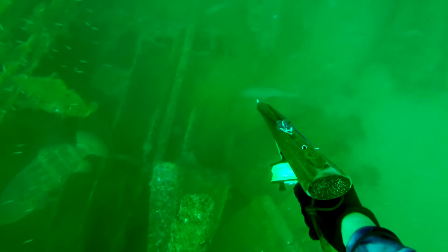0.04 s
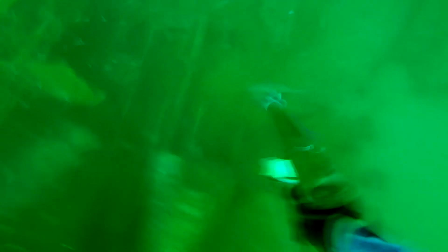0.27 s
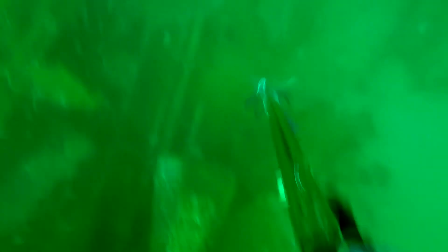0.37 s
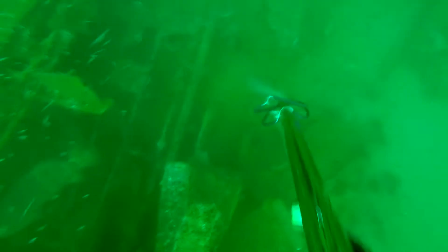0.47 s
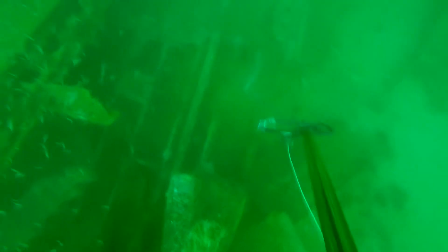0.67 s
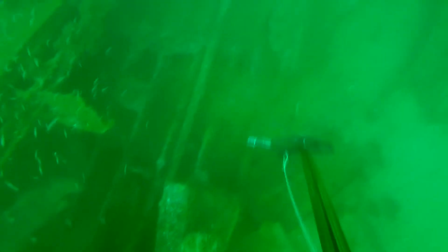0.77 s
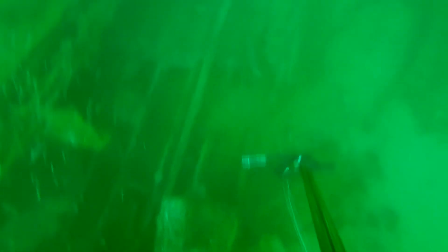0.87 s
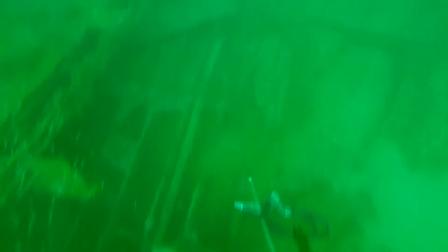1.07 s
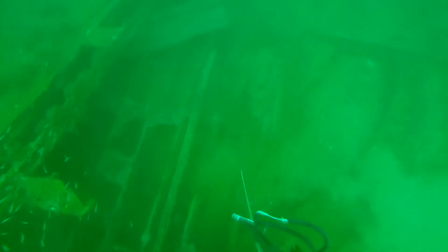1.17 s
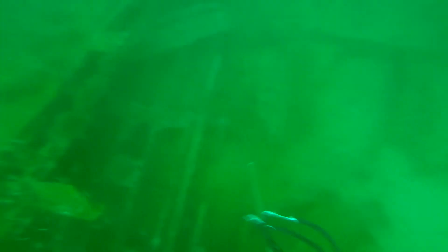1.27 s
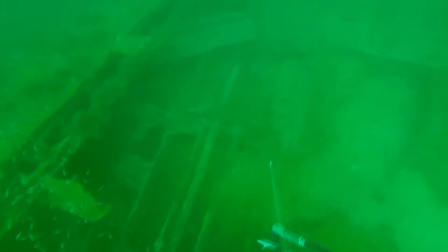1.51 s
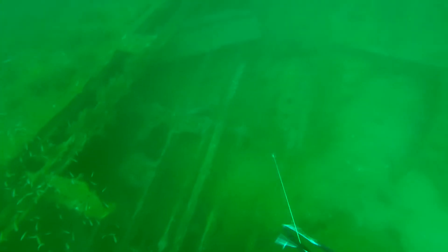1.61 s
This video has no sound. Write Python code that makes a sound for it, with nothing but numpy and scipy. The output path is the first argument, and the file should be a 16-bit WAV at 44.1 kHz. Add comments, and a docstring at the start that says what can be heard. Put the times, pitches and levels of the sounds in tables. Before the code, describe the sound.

A spear gun fires under water: a deep boom, then a sharp clack and brief shaft rattle, fading to tiny ticks; later a duller clack and boom with crackling line, heard close inside a sealed housing.

```python
"""A deep boom, the clack of a spear gun, the rattle of its shaft leaving and the slap of its bands; then small ticks.
Later a second clack and boom come amid a crackling rustle of line and gear, over faint hiss and stirring water.
Place: under water beside a wreck. Microphone: one, in a sealed camera housing. Distance: only in the set levels.
Booms (perhaps a grouper's swim bladder), jolts and the shaft are dying sines; contacts are noise bursts and rattles
are dense random impacts, both ringing the housing's resonances; the murmur and the water are filtered noise."""
import sys
import numpy as np
from scipy.fft import rfft, irfft, next_fast_len
from scipy.io import wavfile
from scipy.ndimage import map_coordinates

SR = 44100
rng = np.random.default_rng(int(sys.argv[2]) if len(sys.argv) > 2 else 0)


def dump_mix(stems):
    """Bounce the given channels to the path in sys.argv[1] as a 16-bit WAV at rate SR."""
    frames = np.atleast_2d(stems).T  # one column per channel
    limited = np.clip(frames, -1, 1)  # hard clip at full scale
    pcm = np.round(limited * 32767).astype(np.int16)
    wavfile.write(sys.argv[1], SR, pcm)


N = 72765
T = np.arange(N) / SR  # time, s

# Deep booms, perhaps a grouper's swim bladder: [start t/s, level/dB, t60/s]
BOOMS = [(0.181, -9, .15), (1.008, -11, 0.16)]
# Soft jolts of gun and housing: [start t/s, f/Hz, level/dB, t60/s, rise/s]
JOLTS = [(0.1917, 160, -30, 0.044, .004), (.2515, 465, -29, 0.024, 0.0031),
         (0.2559, 94, -17, 0.048, 0.0016), (0.2465, 23.7, -10, 0.22, 0.067),
         (0.2941, 164, -22, 0.039, 0.0052), (0.3113, 125, -22.5, 0.061, 0.0051),
         (0.3047, 263, -27, 0.064, 0.0027), (0.347, 162, -28, 0.068, 0.004),
         (0.351, 446, -36.5, 0.049, 0.0024), (.353, 665, -41, 0.027, 0.0012),
         (.358, 130, -24.5, 0.07, 0.0044), (.457, 80, -34.5, .08, 0.0047), (.989, 158, -24.5, 0.05, 0.0079),
         (1.633, 109, -30.5, 0.14, 0.015)]
# Hard contacts: [t/s, level before CLACK_DB/dB, centre of the ring f/Hz, treble relative to body/dB, t60/s]
CONTACTS = [(0.2509, -13, 1500, -8, .01), (.2526, -8, 1430, -14, .02), (.2533, -8.5, 2740, -3.5, 0.016),
            (0.2541, -10.5, 2700, 0, 0.012), (0.256, -16.5, 2350, 1, 0.011),
            (0.2647, -11.5, 2370, -7, 0.036), (0.2692, -11, 2630, -17, .012), (0.2749, -25, 2420, -6, .015),
            (0.2793, -10.5, 2570, -8.5, 0.033), (0.2916, -22, 1700, -8, .015), (.302, -43, 2200, -24, .01),
            (0.312, -34.5, 2400, 3, 0.016), (0.33, -43, 2200, -8, 0.048), (0.3471, -18, 2220, -14, 0.024),
            (0.3527, -13.5, 2700, -10, 0.032), (.3575, -24, 2400, -6, 0.013), (.3617, -18, 2100, -9, 0.014),
            (.3665, -27, 1700, -16, .012), (0.3835, -37, 2110, -3, 0.044), (0.462, -44, 2800, 0, 0.024),
            (0.4737, -34.5, 2920, -1.5, 0.015), (0.4748, -43, 2900, 1, 0.014), (0.477, -41, 2200, 1, 0.013),
            (0.493, -37, 2800, 1.5, 0.019), (.546, -49, 2800, -4, .02), (.5905, -34, 2000, 2, .009),
            (0.5961, -48.5, 3000, 14.5, 0.017), (.616, -44, 2500, 4, .04), (.6224, -36.5, 3360, 13, 0.0077),
            (.629, -32, 2400, -2.5, 0.0072), (0.635, -48, 2800, -9, .01), (0.656, -31, 2000, -18, .01),
            (0.68, -49, 1400, -14, 0.027), (0.915, -33.5, 2210, -8.5, 0.018),
            (.9517, -31, 1720, -23, 0.045), (.9895, -22, 1600, -9, .014), (0.995, -39, 2400, -14, 0.016),
            (.9965, -18, 1290, -44, 0.023), (1.002, -38, 2000, -22, .02), (1.0044, -10, 2500, -27, 0.0093),
            (1.006, -23, 1850, -19, .02), (1.0235, -29, 1850, -16, 0.017), (1.087, -41, 1760, -18, 0.058),
            (1.113, -23, 1740, -23, 0.013), (1.118, -32, 1500, -18, 0.023),
            (1.134, -23.5, 1890, -32, 0.024), (1.15, -30, 1900, -18, 0.025), (1.159, -28, 1870, -16, 0.023),
            (1.225, -25.5, 2200, -24.5, 0.028), (1.229, -29, 1900, -18, 0.03),
            (1.245, -29, 1900, -22, 0.12), (1.3297, -31, 1900, -24, .012), (1.338, -31, 1900, -14, 0.011),
            (1.357, -36, 1750, -18, .02), (1.378, -32, 1900, -18, 0.022), (1.3505, -49, 3500, 6, 0.016),
            (1.363, -46, 3000, 5, 0.016), (1.5618, -20.5, 2600, -29, .01), (1.568, -51, 1500, -15, 0.013),
            (1.577, -31, 2750, -13, 0.023), (1.584, -54, 1350, -14, .02), (1.614, -42, 2900, 2, 0.022),
            (1.6207, -30, 2400, -20, .02), (1.625, -41, 1400, -16, .015), (1.6335, -32, 2750, -4, 0.028),
            (1.639, -43, 2000, -14, .025)]
# Thin ring after the slap: [start t/s, f/Hz, level/dB, t60/s, rise/s]
SHAFT_RING = (.374, 2085, -50, .17, .008)
# Shaft and bands rattling: [t/s, level before swell/dB, treble relative to body/dB, tilt of body/dB per octave]
RATTLE = [(.252, -35, -6, 3), (.262, -44.5, -5, 4), (.282, -39.5, 3, -12), (.298, -39.5, -15, -3.5),
          (.316, -44.5, -16, -3), (.324, -52, -6, -1), (.346, -54.5, -10, -11), (.356, -34.5, -14.5, -9),
          (.371, -41.5, -7.5, 4.5), (.378, -61.5, -13, 12), (.4, -61, -4, 6), (.44, -70, -13, 4)]
# Rustle of line and gear: [t/s, level before swell/dB, treble relative to body/dB, tilt of body/dB per octave]
RUSTLE = [(0.93, -64.5, -27, -7), (0.956, -61.5, 3, 15), (0.976, -56.5, -42, -4), (0.992, -47, 0.5, 19),
          (1.014, -48, -14.5, -4), (1.126, -51, -18.5, 1.5), (1.192, -52.5, -14, 3.5),
          (1.22, -52, -10.5, 3.5), (1.342, -52, -14, -4.5), (1.348, -50.5, -6, -6.5),
          (1.406, -62, -17, -8.5), (1.452, -62, -4, 0), (1.502, -63, -11, -1), (1.512, -58.5, 5, 3),
          (1.526, -69.5, -8, 26), (1.568, -51.5, -2.5, -17), (1.59, -67.5, -8, 3), (1.65, -44.5, -12, 4)]
# Low resonances of the housing: [f/Hz, width before damping/Hz, relative level/dB]
BODY_MODES = [(1245, 110, 5.5), (1320, 51, -3.5), (1435, 100, -3), (1789, 48, 3), (1860, 47, 6),
              (2114, 136, 1), (2325, 164, 0.5), (2740, 257, 1), (3056, 50, -0.5), (3025, 85, -1),
              (3500, 420, -6)]
# High resonances of the housing: [f/Hz, width before damping/Hz, relative level/dB]
SHELL_MODES = [(3830, 390, -2.5), (4510, 467, 9.5), (4910, 840, 6.5), (5400, 334, 2), (6270, 243, -2),
               (7630, 720, -11.5), (9900, 600, -34), (11800, 1200, -22)]
# Lingering low murmur of the housing: [t/s, level/dB]
MURMUR = [(.95, -59.5), (1.1, -62.5), (1.35, -66), (1.45, -60.5), (1.58, -72), (1.65, -59)]
# Spectrum of the steady water hiss: [f/Hz, relative level/dB]
HISS_SPECTRUM = [(88, -60), (150, -4.5), (243, -6), (284, -4.5), (418, -7), (907, -10), (1080, -11.5),
                 (1340, -11.5), (5080, -22.5), (15300, -40.5)]
# Low stirring of the water: [t/s, upper band level before swell/dB, lowest band level/dB]
SURGE = [(0.0, -64, -58), (0.142, -62.5, -56.5), (0.27, -51, -43), (0.32, -48, -33), (0.458, -52.5, -51),
         (0.61, -55.5, -56.5), (0.758, -57, -59.5), (0.918, -57.5, -54), (1.066, -50.5, -45),
         (1.158, -56.5, -54), (1.276, -56.5, -51.5), (1.414, -54, -52), (1.65, -61, -57.5)]

BOOM_HZ, BOOM_RISE_S = 57.5, 0.025
CLACK_DB, STRIKE_DB = -7, 16  # gain of all contacts; extra on the first sample of each
FOCUS_DB = 18.5  # body loss per octave away from the centre of the ring
CLACK_DAMPING = 2.6  # widens every resonance under hard contacts
CLACK_TOP_HZ, CRACKLE_TOP_HZ = 9500, 6500  # high edge of the shell
BODY_EDGE_HZ, BODY_TOP_HZ = 1150, 3800  # low edge of the whole housing, high edge of the body
GRAINS_PER_S, GRAIN_SPREAD_DB = 1500, 5.5
RATTLE_SWELL_DB, RUSTLE_SWELL_DB, MODE_WANDER_DB = 3.0, 1, 2.5
SHARED = 0.41  # power share of impacts common to all modes
TILT_PIVOT_HZ = 2000
MURMUR_HZ, MURMUR_WIDTH_HZ = 1214, 67
HISS_DB = -58
SURGE_HZ, SPLIT_HZ = 128, 64  # roll-off of the upper band; border between the bands
TOP_HZ = 15300  # band limit of the camera


def thuds():
    """Booms, perhaps a grouper's swim bladder, and jolts of gun and housing: low sines that swell and die."""
    booms = sum(swing(start, BOOM_HZ, db, t60, BOOM_RISE_S) for start, db, t60 in BOOMS)
    jolts = sum(swing(*row) for row in JOLTS)
    return booms + jolts


def clacks():
    """Each contact is a sharp strike and a dying noise burst; higher shell modes are pushed more briefly."""
    dull = np.zeros((len(BODY_MODES), N))
    bright = np.zeros((len(SHELL_MODES), N))
    burst_t = T[:SR // 10]
    shell_hz = np.array(SHELL_MODES)[:, :1]
    for start, db, centre_hz, treble_db, t60 in CONTACTS:
        i = round(start * SR)
        t = burst_t[:N - i]
        span = slice(i, i + len(t))
        fall_db = -60 * t / t60
        peak_db = db + CLACK_DB + STRIKE_DB * (t == 0)
        off_centre_db = FOCUS_DB * np.abs(body_octaves(centre_hz))
        dull[:, span] += amp(peak_db + fall_db - off_centre_db)
        bright[:, span] += amp(peak_db + treble_db + fall_db * shell_hz / shell_hz[0])
    sign = np.sign(rng.standard_normal(N))  # turns the envelopes into noise
    return housing(dull * sign, bright * sign, CLACK_TOP_HZ, CLACK_DAMPING)


def shaft_ring():
    """The thin ring after the slap, one swelling and dying sine."""
    return swing(*SHAFT_RING)


def crackle(table, swell_db):
    """Rattle or rustle: impacts under a level curve, partly common to all modes, partly each mode's own."""
    level_db, treble_db, tilt_db = curves(table)
    gain = amp(level_db + swell_db * wobble(59.55))
    common = np.sqrt(SHARED) * impacts(count=1)

    def pushes(modes):
        """Impacts on each mode, whose strength wanders alone."""
        mixed = common + np.sqrt(1 - SHARED) * impacts(len(modes))
        return mixed * amp([MODE_WANDER_DB * wobble(70) for _ in modes])

    body_tilt = amp(tilt_db.clip(-20, 20) * body_octaves(TILT_PIVOT_HZ))
    dull = gain * pushes(BODY_MODES) * body_tilt
    bright = gain * pushes(SHELL_MODES) * amp(treble_db)
    return housing(dull, bright, CRACKLE_TOP_HZ)


def impacts(count):
    """Rows of dense tiny impacts at random moments and of uneven size, scaled together to rms 1."""
    hit = rng.random((count, N)) < GRAINS_PER_S / SR
    strength = rng.standard_normal((count, N))
    spread = amp(GRAIN_SPREAD_DB * rng.exponential(size=(count, N))).clip(max=8)
    return unit(hit * strength * spread)


def housing(dull, bright, top_hz, damping=1):
    """Contacts ring the low body modes and the high shell modes of the sealed housing."""
    body = ringing(dull, BODY_MODES, BODY_TOP_HZ, damping)
    shell = ringing(bright, SHELL_MODES, top_hz, damping)
    return body + shell


def ringing(pushes, modes, top_hz, damping):
    """One push signal per resonance; their total power is set to 1 before a steep low and a high edge."""
    centre, width, db = np.transpose(modes)[..., None]

    def response(f):
        """Resonances between the two edges."""
        loss = 1j * f * width * damping
        modal = amp(db) * loss / (centre * centre - f * f + loss)
        modal = modal / np.sqrt(np.mean(np.abs(modal) ** 2) * len(modal))
        low, high = 1j * f / BODY_EDGE_HZ, 1j * f / top_hz
        low_edge = (low * low / (1 + low + low * low)) ** 3
        high_edge = 1 / (1 + 1.218 * high + high * high) ** 2
        return modal * low_edge * high_edge

    alternating = (-1) ** np.arange(len(centre))[:, None]  # neighbouring modes have opposite sign
    return (filtered(pushes, response) * alternating).sum(0)


def body_octaves(hz):
    """Signed distance in octaves of each body mode from hz."""
    return np.log2(np.array(BODY_MODES)[:, :1] / hz)


def murmur():
    """A low housing resonance hums unevenly while gear rubs: noise passed twice through one mode."""
    def ring(f):
        """A single damped resonance."""
        loss = 1j * f * MURMUR_WIDTH_HZ
        return loss / (MURMUR_HZ ** 2 - f * f + loss)

    hum = filtered(filtered(rng.standard_normal(N), ring), ring)
    level_db, = curves(MURMUR)
    return unit(hum) * amp(level_db)


def water():
    """Background: steady shaped hiss and a low uneven stirring in two bands of noise."""
    spectrum_hz, spectrum_db = np.transpose(HISS_SPECTRUM)

    def hiss_shape(f):
        """Spectrum drawn between its points on a log frequency axis."""
        return amp(np.interp(np.log(f + 1), np.log(spectrum_hz + 1), spectrum_db))

    hiss = filtered(rng.standard_normal(N), hiss_shape)
    upper = filtered(rng.standard_normal(N), lambda f: (f > SPLIT_HZ) / (1 + (f / SURGE_HZ) ** 2))
    lowest = filtered(rng.standard_normal(N), lambda f: (f > 20) & (f < SPLIT_HZ))
    upper_db, lowest_db = curves(SURGE)
    stirring = unit(upper) * amp(upper_db + 1.6 * wobble(28)) + unit(lowest) * amp(lowest_db)
    return amp(HISS_DB) * unit(hiss) + stirring


def swing(start, hz, db, t60, rise):
    """A sine that swells over the rise while dying 60 dB per t60."""
    t = np.clip(T - start, 0, None)
    swell = np.sin(np.pi / 2 * np.clip(t / rise, 0, 1)) ** 2
    return amp(db - 60 * t / t60) * swell * np.sin(2 * np.pi * hz * t)


def amp(db):
    """dB to gain."""
    return 10 ** (np.asarray(db) / 20)


def unit(x):
    """Scale to rms 1."""
    return x / np.sqrt(np.mean(x ** 2) + 1e-20)


def curves(rows):
    """Each column after the time, per sample; -120 outside the table."""
    t, *columns = np.transpose(rows)
    return [np.interp(T, t, column, -120, -120) for column in columns]


def wobble(rate):
    """A smooth random curve, rate knots a second."""
    knots = rng.standard_normal(int(N * rate / SR) + 4)
    return map_coordinates(knots, [T * rate])


def filtered(x, response):
    """Filter x by a response of frequency, with zero padding for the tail."""
    m = next_fast_len(N + SR // 2)
    spectrum = rfft(x, m) * response(np.fft.rfftfreq(m, 1 / SR))
    return irfft(spectrum, m)[..., :N]


def scene():
    """Booms, gun, gear, housing and water summed at the one microphone."""
    shot = clacks() + shaft_ring() + crackle(RATTLE, RATTLE_SWELL_DB)
    gear = crackle(RUSTLE, RUSTLE_SWELL_DB) + murmur()
    return (thuds() + shot + gear + water())[None]


def record(dry):
    """The camera keeps nothing above its band limit."""
    return filtered(dry, lambda f: f < TOP_HZ)


dry = scene()
out = record(dry)
dump_mix(out)
```